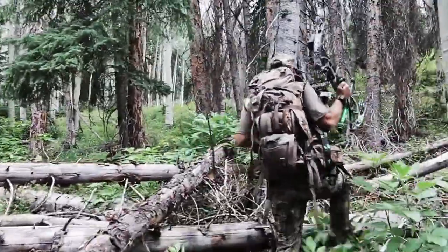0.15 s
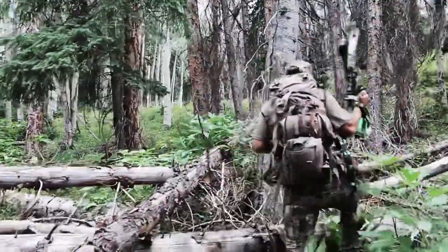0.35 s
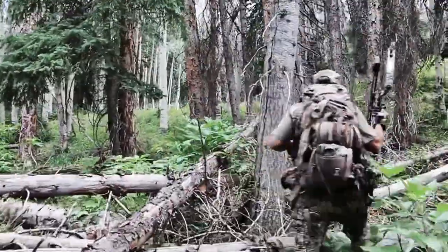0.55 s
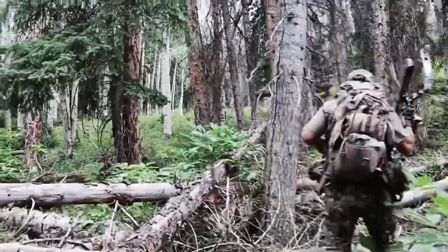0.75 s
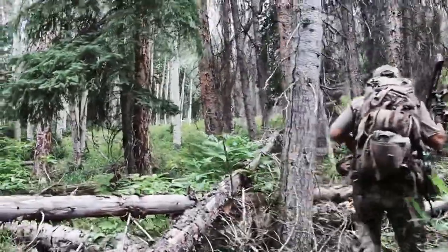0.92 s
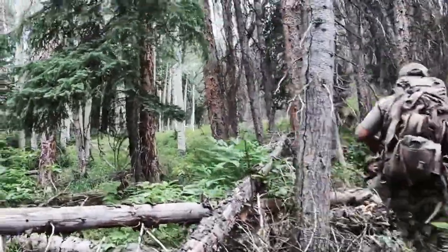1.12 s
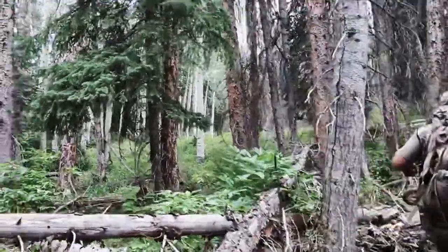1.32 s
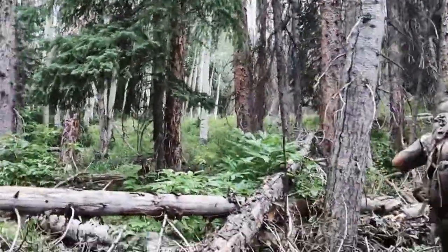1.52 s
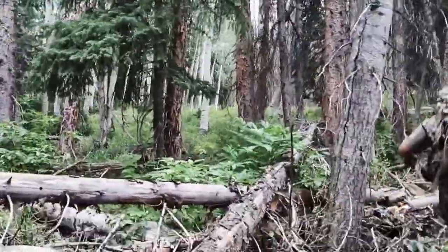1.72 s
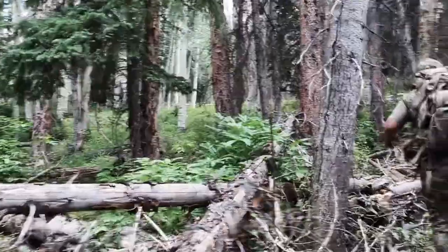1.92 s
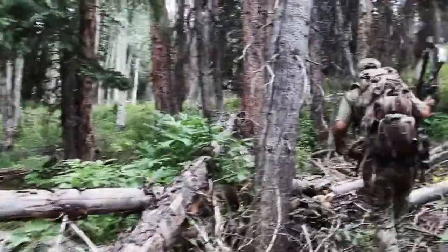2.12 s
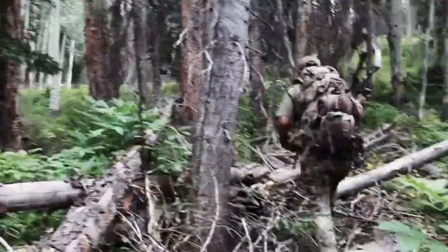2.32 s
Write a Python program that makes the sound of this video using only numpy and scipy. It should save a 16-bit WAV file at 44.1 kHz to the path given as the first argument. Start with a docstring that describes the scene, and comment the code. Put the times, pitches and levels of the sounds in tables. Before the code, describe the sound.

Boots crunch over forest deadfall, dry twigs snapping sharply with dull woody knocks and rustling leaves

```python
"""A walker with a pack steps over deadfall in a forest, close to two microphone ports; 2.35 s.
Throughout: treads, rustle and leaf hiss as grainy coloured noise on level curves, over faint port rumble.
Dull knocks of dead wood and soil (short damped swings) start at once, twig snaps (noise and a tone
through a resonance) at 0.17 s; snaps crowd near 0.5, 1.09 and 2.07 s. Trees scatter knocks and snaps."""
import sys
import numpy as np
from scipy import signal
from scipy.fft import rfft, irfft, next_fast_len
from scipy.io import wavfile
from scipy.ndimage import uniform_filter1d, map_coordinates

SR = 44100
rng = np.random.default_rng(int(sys.argv[2]) if len(sys.argv) > 2 else 0)


def unload_audio(sound):
    """Save the sound as a 16-bit wav file, at the path given as the first command line argument."""
    columns = np.transpose(np.atleast_2d(sound))
    # keep every value between -1 and 1, then stretch to whole-number steps
    steps = np.round(np.clip(columns, -1, 1) * 32767)
    wavfile.write(sys.argv[1], SR, steps.astype(np.int16))


def volts(x):
    """Linear amplitude factor 10**(x/20) for a level x in dB, scalar or array-like."""
    e = np.asarray(x, float) / 20
    return 10 ** e


N = 103635

# Soil and wood under the boots, level: (time [s], level [dB])
TREAD_LEVEL = [(0, -37), (.16, -44), (.3, -36.5), (.37, -35.5), (.44, -48), (.54, -28.5), (.61, -46),
               (.69, -44.5), (.82, -46.5), (.93, -43.5), (1.05, -41), (1.2, -41.5), (1.28, -48),
               (1.45, -38.5), (1.64, -43.5), (1.8, -37.5), (1.93, -53), (2.0, -51.5), (2.17, -50),
               (2.27, -46), (2.35, -45)]
# Litter and cloth, level: (time [s], level [dB])
RUSTLE_LEVEL = [(0, -42.5), (.11, -40.5), (.18, -39.5), (.22, -33.5), (.27, -34), (.33, -30), (.39, -34),
                (.46, -38.5), (0.512, -20.5), (.56, -29.5), (.62, -37.5), (0.681, -39.5), (.72, -32),
                (.79, -42), (.95, -41), (1.07, -35), (1.12, -35.5), (1.22, -38), (1.28, -42.5), (1.37, -39),
                (1.48, -36.5), (1.58, -37.5), (1.84, -41), (1.9, -37), (2.0, -38.5), (2.1, -40.5),
                (2.14, -44), (2.22, -36.5), (2.35, -41)]
# Leaves brushing past, level: (time [s], level [dB])
HISS_LEVEL = [(0, -43), (.18, -44), (.22, -38.5), (.33, -38), (.45, -44.5), (0.518, -28.5), (.6, -39.5),
              (.67, -45), (.82, -45), (.92, -39), (1.06, -40.5), (1.13, -38), (1.23, -48.5), (1.48, -48),
              (1.56, -43.5), (1.82, -45.5), (1.87, -37.5), (1.93, -36.5), (1.97, -46), (2.05, -37.5),
              (2.11, -41.5), (2.22, -40.5), (2.35, -47.5)]
# Tread spectrum: (frequency [Hz], relative level [dB])
TREAD_SPECTRUM = [(20, -27), (45, -31), (90, -1.5), (160, -1.5), (350, -3.5), (600, -11), (900, -23),
                  (1400, -34)]
# Rustle spectrum: (frequency [Hz], relative level [dB])
RUSTLE_SPECTRUM = [(200, -11), (450, -2), (800, -2), (1250, 0.5), (1600, -5.5), (2100, -5), (2900, -8),
                   (3500, -13), (5000, -43)]
# Leaf hiss spectrum: (frequency [Hz], relative level [dB])
HISS_SPECTRUM = [(1500, -12), (3200, -1), (4000, 0), (5000, -1), (5700, -3), (8000, -4.5), (11000, -8),
                 (15500, -16.5), (16500, -41)]
# Narrow thin hiss, spectrum: (frequency [Hz], relative level [dB])
THIN_HISS_SPECTRUM = [(4500, -33), (5100, 0), (5700, -47)]
# Left-right likeness of sound from all around: (frequency [Hz], likeness [-1..1])
DIFFUSE_LIKENESS = [(60, 0.91), (160, 1), (700, 0.99), (1400, 1), (1900, 0.67), (3300, 0.29), (5500, 0.02),
                    (15000, 0.027)]
# Dead wood and soil knocked by the boots: (peak time [s], level [dB], pitch [Hz], ring [cycles])
KNOCKS = [(0.028, -22, 400, 8.1), (0.22, -26, 270, 3.3), (0.308, -19, 530, 3), (.429, -24, 530, 4.3),
          (0.48, -14, 496, 0.82), (0.5119, -6, 333, 0.47), (0.532, -17.5, 242, 1.4),
          (0.542, -19.5, 139, 2.7), (.599, -30, 298, 0.72), (.6, -31, 82.5, 3), (0.633, -6, 643, 1.05),
          (0.6509, -9, 485, 0.65), (0.72, -19, 293, 1.8), (0.774, -21, 616, 0.39), (1.106, -17.5, 617, 2.7),
          (1.14, -24.5, 587, 0.63), (1.16, -17, 630, 0.62), (1.439, -16, 288, 1.6),
          (1.4415, -23.5, 596, 4.1), (1.454, -26, 206, 0.56), (1.459, -37, 60, 3),
          (1.525, -13.5, 920, 0.92), (1.5355, -13.5, 824, 5), (1.539, -23.5, 132, 2.5),
          (1.709, -16.5, 400, 0.33), (1.7876, -19, 412, 2.9), (1.8106, -10, 713, 2.8),
          (1.857, -23, 980, 7.4), (1.9148, -16, 720, 1.7), (1.918, -23, 187, 0.8), (2.0572, -17, 339, 2.5),
          (2.0637, -16, 524, 1.5), (2.0815, -14.5, 514, 0.63), (2.324, -26.5, 576, 2.6)]
# Decay of the scatter among trees: (frequency [Hz], t60 [s])
TREE_DECAY = [(200, 0.14), (2000, 0.048), (10000, 0.02)]
# Twigs breaking: (onset [s], peak [dB], pitch [Hz], t60 [s], broad crack over ring [dB], left lag [ms])
SNAPS = [(0.1684,-23,4000,0.014,-22,0.095),(0.2008,-13,4460,0.05,22,0.094),(0.3182,-23,1830,0.036,0,0.074),(0.403,-15,2075,0.022,-8,0.083),
         (0.4375,-21.5,3180,0.026,7,0.04),(0.471,-20,3130,0.022,16,0.039),(0.4925,-8.5,1675,0.028,-15,0.034),(0.5033,-10,1200,0.03,-13,0.021),
         (0.5053,-2,2300,0.025,-6,0.038),(0.523,-9,2165,0.021,-24,0.028),(0.528,-14,1104,0.028,-28,0.022),(0.5683,-17.5,1270,0.046,-18,0.029),
         (0.693,-27.5,3580,0.0073,-17,0.06),(0.782,-26.5,1843,.05,-21,0.067),
         (1.08,-11.5,1330,0.0089,2,0.13),(1.0879,-5,2620,0.022,-21,0.016),(1.094,-9,4300,0.014,29,0.12),(1.0888,-13.5,1002,0.073,-36,0.073),
         (1.1585,-12.5,4580,0.0086,3,0.047),(1.1912,-19.5,3000,0.0054,-1,0.033),(1.214,-24.5,3630,0.0057,-9,0.029),(1.245,-30.5,2340,0.0062,-6,0.02),
         (1.354,-26,1120,0.028,-36,0.058),(1.378,-27,1620,0.0061,-34,0.095),(1.4122,-30,2400,0.01,-17,0.075),(1.535,-16.5,4210,0.064,3,0.082),
         (1.554,-21,1160,0.026,-8,0.077),(1.6139,-24.5,3060,0.006,-3,0.044),(1.729,-26,4060,.03,19,0.18),
         (1.8347,-26.5,4930,0.02,13,0.082),(1.8525,-16,9000,0.017,-6.5,0.062),(1.853,-17,3320,0.021,-32,0.052),
         (1.9123,-10,4140,0.015,30,0.049),(2.026,-31,4600,.01,-1,0.068),(2.038,-17,3840,0.032,4,0.056),(2.0612,2,4480,0.008,-7.5,0.045),
         (2.0663,-5.5,6770,0.013,0,0.031),(2.0794,0,5070,0.0082,-6,0.062),(2.0822,-12,2495,0.032,-14,0.054),(2.195,-19.5,5400,0.0081,0,0.026),
         (2.209,-22.5,8100,0.0046,-14,0.03),(2.2807,-27.5,6700,0.012,-1,0.03)]
# Left-right likeness of near twigs: (frequency [Hz], likeness [-1..1])
TWIG_LIKENESS = [(300, .995), (1400, 1), (1900, 0.36), (4000, 0.31), (15000, 0.2)]

DIFFUSE_LEFT_LAG_MS, LAG_FADES_HZ = 0.026, 11900  # the ports' lag is lost above the latter
THIN_HISS_DB = -18  # re rustle level curve
PORT_RUMBLE_DB, PORT_RUMBLE_HZ = -63, 90
KNOCK_RISE_CYCLES, KNOCK_GRIT_DB = 0.36, -11
KNOCK_TICK_DB, KNOCK_TICK_CYCLES = -5, 0.05  # sharp first contact
KNOCK_LOW_SHARE, KNOCK_HIGH_TIMES = 0.18, 4.5  # band edges, multiples of pitch
TREES_DB = -29
SPLINTERS_PER_S, SPLINTER_DB = 490, 6  # fibres tearing
SNAP_RISE_CYCLES, SNAP_STAGE_Q, SNAP_BREAK_DB, SNAP_TONE_DB = 0.5, 1.4, 13, -7.5
SNAP_TAIL_DB, SNAP_TAIL_TIMES, SNAP_TAIL_MAX_T60_S = -21, 7, 0.18
CRACK_LOW_HZ, CRACK_HIGH_HZ = 400, 5970
SNAP_WAVER_RAD2_PER_CYCLE = 0.4  # the twig's mode loses its phase within a few cycles


def unit(x):
    """Scaled to rms 1."""
    return x / np.sqrt(np.mean(x ** 2) + 1e-20)


def along(points, hz):
    """(Hz, value) points interpolated on a log frequency axis."""
    f, v = np.transpose(points)
    return np.interp(np.log(hz + 1), np.log(f + 1), v)


def wobble(knots_per_s):
    """A smooth random curve through normal-distributed knots."""
    knots = rng.standard_normal(int(N * knots_per_s / SR) + 4)
    return map_coordinates(knots, [np.arange(N) * knots_per_s / SR])


def filtered(x, response):
    """x through a complex response of frequency."""
    n = x.shape[-1]
    padded = next_fast_len(n + 4096)
    return irfft(rfft(x, padded) * response(np.fft.rfftfreq(padded, 1 / SR)), padded)[..., :n]


def ports(pair, left_lag_ms, likeness):
    """Two signals mixed as mid and side to a likeness by frequency, left port late."""
    def mid_side_gains(hz):
        turn = np.arccos(np.clip(along(likeness, hz), -1, 1)) / 2
        return np.array([np.cos(turn), np.sin(turn)])

    def lag(hz):
        lagging_hz = hz / (1 + (hz / LAG_FADES_HZ) ** 2)
        return np.exp(1j * np.pi * lagging_hz * left_lag_ms / 1000 * np.array([[-1], [1]]))

    mid, side = filtered(pair, mid_side_gains)
    return filtered(np.array([mid + side, mid - side]), lag)


def grainy(spectrum, grains_per_s, spread_db, life_s, grain_db, patchy_db):
    """Patchy coloured noise flaring in short grains of random size; two ports, rms 1."""
    z = signal.stft(rng.standard_normal((2, N)), nperseg=256)[2]
    field = uniform_filter1d(rng.standard_normal(z.shape[1:]), 5, 0)  # over frequency
    field = uniform_filter1d(field, 8, 1)  # over time
    pair = signal.istft(z * volts(patchy_db * unit(field)), nperseg=256)[1][:, :N]
    size_db = np.minimum(spread_db * rng.exponential(1, N), 3 * spread_db)
    hits = (rng.random(N) < grains_per_s / SR) * volts(size_db)
    flare = signal.lfilter([1], [1, -np.exp(-1 / (life_s * SR))], hits)
    shaped = pair * (1 + volts(grain_db) * flare)
    coloured = filtered(shaped, lambda hz: volts(along(spectrum, hz)))
    return unit(ports(coloured, DIFFUSE_LEFT_LAG_MS, DIFFUSE_LIKENESS))


def strides():
    """Soil and wood under the boots, litter and cloth, leaves brushing past: many small contacts."""
    t = np.arange(N) / SR
    tread_db = np.interp(t, *np.transpose(TREAD_LEVEL))
    rustle_db = np.interp(t, *np.transpose(RUSTLE_LEVEL))
    hiss_db = np.interp(t, *np.transpose(HISS_LEVEL))
    shared_db = 0.21 * wobble(29.25)
    tread = grainy(TREAD_SPECTRUM, 60, 2, life_s=0.006, grain_db=-8, patchy_db=1.5)
    tread *= volts(tread_db + shared_db + 1.6 * wobble(40))
    rustle = grainy(RUSTLE_SPECTRUM, 200, 1.5, life_s=0.0012, grain_db=-3, patchy_db=2.4)
    rustle *= volts(rustle_db + shared_db + 1.3 * wobble(45))
    hiss = grainy(HISS_SPECTRUM, 70, 1.24, life_s=0.0019, grain_db=-0.92, patchy_db=1.0)
    hiss *= volts(hiss_db + shared_db + 0.4 * wobble(59.77))
    noise = rng.standard_normal((2, N))
    thin = unit(filtered(noise, lambda hz: volts(along(THIN_HISS_SPECTRUM, hz))))
    thin *= volts(rustle_db + THIN_HISS_DB + 1.6 * wobble(9.6))
    return tread + rustle + hiss + thin


def port_rumble():
    """Faint air on the two ports: low-passed noise, unrelated left and right."""
    air = filtered(rng.standard_normal((2, N)), lambda hz: 1 / (1 + (hz / PORT_RUMBLE_HZ) ** 2))
    return volts(PORT_RUMBLE_DB + 1.6 * wobble(3.94)) * unit(air)


def knocks():
    """A dull push that swings back and dies within a few cycles, with grit and a contact tick."""
    out, lead = np.zeros(N + SR), SR // 50
    t = np.arange(-lead, SR // 12) / SR
    for peak_s, db, pitch_hz, ring_cycles in KNOCKS:
        u = t * pitch_hz  # cycles from the peak
        rise = np.exp(-0.5 * (u / KNOCK_RISE_CYCLES) ** 2)
        shape = np.where(u < 0, rise, np.exp(-2 * u / ring_cycles))
        noise = rng.standard_normal(len(t))
        grit = volts(KNOCK_GRIT_DB) * unit(uniform_filter1d(noise, size=int(SR / pitch_hz / 4)))
        # half a cycle ahead of the peak
        tick = volts(KNOCK_TICK_DB) * np.exp(-np.abs(u + 0.5) / KNOCK_TICK_CYCLES)
        low_hz, high_hz = KNOCK_LOW_SHARE * pitch_hz, KNOCK_HIGH_TIMES * pitch_hz

        def band(hz):
            high_pass = (hz / low_hz) ** 2 / (1 + (hz / low_hz) ** 2)
            return high_pass / (1 + (hz / high_hz) ** 4)

        swing = filtered(shape * (np.cos(2 * np.pi * u) + grit), band)
        at = round(peak_s * SR)
        out[at:at + len(t)] += volts(db) * (swing - tick)
    return out[lead:N + lead]


def trees(x):
    """Scatter from trunks and undergrowth: convolution with noise dying by band."""
    hz, t, z = signal.stft(rng.standard_normal((2, SR // 3)), SR, nperseg=256)
    decay = volts(-60 * t / along(TREE_DECAY, hz)[:, None])
    tail = signal.istft(z * decay, SR, nperseg=256)[1]
    tail = ports(tail, DIFFUSE_LEFT_LAG_MS, DIFFUSE_LIKENESS)
    return signal.fftconvolve(x[None], tail / np.linalg.norm(tail[0]), axes=1)[:, :N]


def snaps():
    """A twig breaks: click, tone and splintering noise through its resonance and a broad crack."""
    out, t = np.zeros((2, N + SR)), np.arange(SR // 8) / SR
    for onset_s, db, pitch_hz, t60_s, crack_db, left_lag_ms in SNAPS:
        rise = 1 - np.exp(-t * pitch_hz / SNAP_RISE_CYCLES)
        decay_db = -60 * t / t60_s
        tail_t60_s = min(SNAP_TAIL_TIMES * t60_s, SNAP_TAIL_MAX_T60_S)
        burst = rise * (volts(decay_db) + volts(SNAP_TAIL_DB - 60 * t / tail_t60_s))
        splinters = 1 + volts(SPLINTER_DB) * (rng.random(len(t)) < SPLINTERS_PER_S / SR)
        force = burst * splinters * rng.standard_normal((2, len(t)))  # mid, side
        force[0, 8] += volts(SNAP_BREAK_DB)  # click
        drift_rad = np.cumsum(rng.standard_normal(len(t)))
        drift_rad *= np.sqrt(SNAP_WAVER_RAD2_PER_CYCLE * pitch_hz / SR)
        tone = np.sin(2 * np.pi * (pitch_hz * t + rng.random()) + drift_rad)
        force[0] += volts(SNAP_TONE_DB + decay_db) * rise * tone

        def response(hz):
            damping = 1j * hz * pitch_hz / SNAP_STAGE_Q
            ring = damping / (pitch_hz ** 2 - hz * hz + damping)
            crack = 1j * hz / (CRACK_LOW_HZ + 1j * hz) / (1 + 1j * hz / CRACK_HIGH_HZ)
            return ring ** 2 + volts(crack_db) * crack

        pair = filtered(force, response)
        peak = np.sqrt(np.sort(pair[0] ** 2)[-12:].mean())  # rms of the 12 largest mid samples
        pair = ports(pair / peak, left_lag_ms, TWIG_LIKENESS)
        out[:, round(onset_s * SR):][:, :len(t)] += volts(db) * pair
    return out[:, :N]


def scene():
    """All sources at the two ports."""
    hits = knocks() + snaps()
    return strides() + port_rumble() + hits + volts(TREES_DB) * trees(hits.mean(0))


def roll_off(x):
    """The treble ends steeply here."""
    return signal.sosfilt(signal.butter(12, 16500, fs=SR, output="sos"), x)


def record(dry):
    """Second-order bass roll-off at 63.5 Hz, band limit at 15850 Hz, clipping at full scale."""
    def mic(hz):
        return (hz < 15850) * (1j * hz / (63.5 + 1j * hz)) ** 2

    mix = np.clip(filtered(dry, mic), -1, 1)
    return roll_off(mix)


dry = scene()
out = record(dry)
unload_audio(out)
```